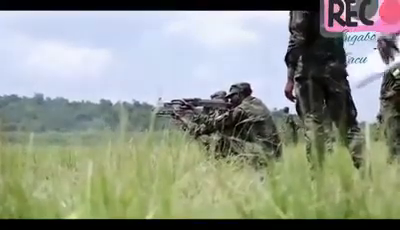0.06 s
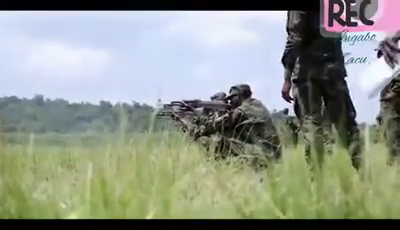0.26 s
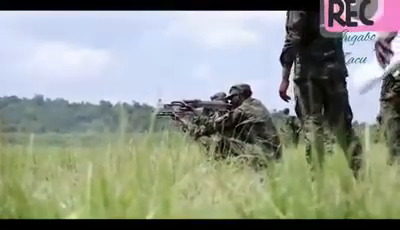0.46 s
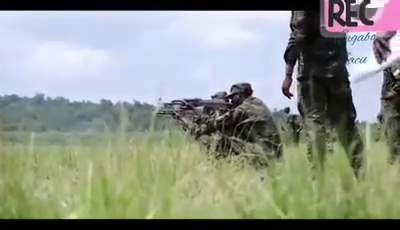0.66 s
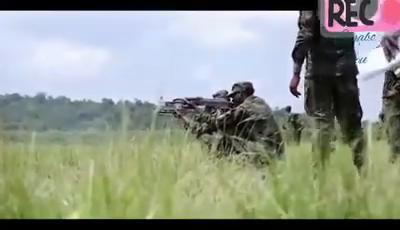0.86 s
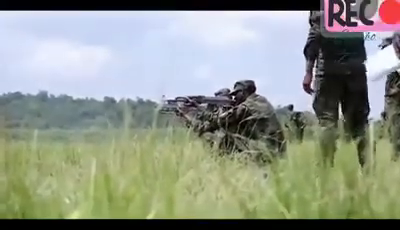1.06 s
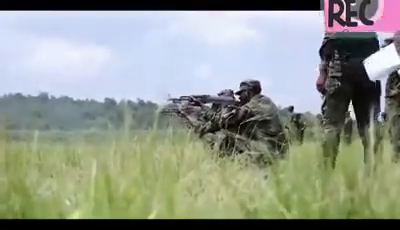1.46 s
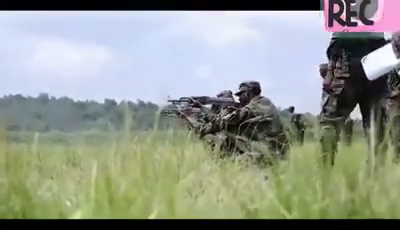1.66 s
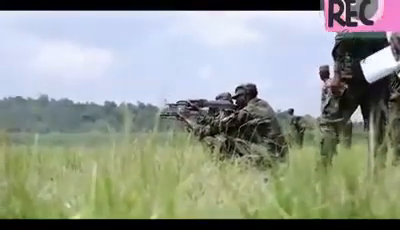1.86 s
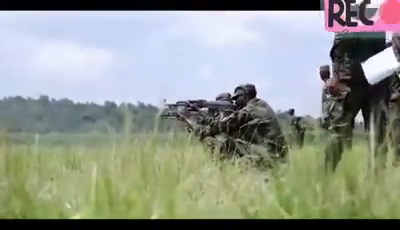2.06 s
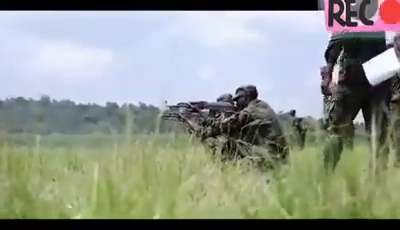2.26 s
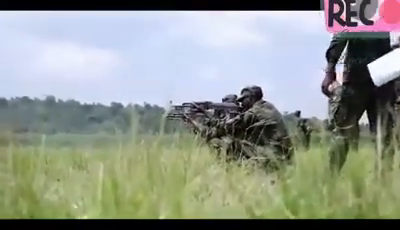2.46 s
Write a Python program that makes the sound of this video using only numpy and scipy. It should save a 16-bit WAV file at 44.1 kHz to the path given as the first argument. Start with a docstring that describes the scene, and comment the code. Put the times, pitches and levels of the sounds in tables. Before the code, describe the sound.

Rifles fire a ragged string of sharp cracks and thumps across an open field.

```python
"""An open grass field, where soldiers fire rifles in a ragged line beside a small microphone.
Shots along the line arrive as a snap and a round thump over the ground; the closest ones as a
bright tearing crack. Grass and a far tree line scatter each shot back. Rifle parts click over
a faint outdoor hiss and low wind. The shots overload the microphone, and its automatic
volume control turns their echoes down."""
import sys
import numpy as np
from scipy import signal
from scipy.fft import rfft, irfft
from scipy.io import wavfile
from scipy.ndimage import uniform_filter1d

SR = 44100
rng = np.random.default_rng(int(sys.argv[2]) if len(sys.argv) > 2 else 0)


def int16_out(signal):
    """Quantize to a 16-bit WAV file."""
    q = np.round(np.clip(np.atleast_2d(signal).T, -1, 1) * 32767)
    wavfile.write(sys.argv[1], SR, q.astype(np.int16))


N = 110250


def amp(db):
    """Turns decibels into a number to multiply a sound by."""
    return 10 ** (np.asarray(db) / 20)


def unit(x):
    """Scales a sound to an average strength (rms) of 1."""
    return x / np.sqrt(np.mean(x ** 2) + 1e-20)


def look_up(table, hz, column=1):
    """Reads a table at any frequency, sliding smoothly between its rows."""
    table = np.array(table, float)
    return np.interp(np.log(hz + 1), np.log(table[:, 0] + 1), table[:, column])


def add(mix, start_s, sound):
    """Mixes a sound in at the given time."""
    part = mix[max(round(start_s * SR), 0):][:len(sound)]
    part += sound[:len(part)]


def noise(tone, size):
    """Steady noise; the tone table says how strong its lows and highs are."""
    hz = np.fft.rfftfreq(size, 1 / SR)
    phases = np.exp(2j * np.pi * rng.random(len(hz)))
    return unit(irfft(phases * amp(look_up(tone, hz)), size))


def dying_noise(table, hold_s=0):
    """One second of noise in which each frequency holds, then dies at its own speed."""
    hz, t, bands = signal.stft(rng.standard_normal(SR), SR, nperseg=256)
    fade_s = np.maximum(look_up(table, hz, column=2), .01)[:, None]
    fade = amp(-60 * np.maximum(t - hold_s, 0) / fade_s)
    tail = signal.istft(bands * fade, SR, nperseg=256)[1][:SR]
    tone = amp(look_up(table, np.fft.rfftfreq(2 * SR, 1 / SR)))
    return irfft(rfft(tail, 2 * SR) * tone)[:SR]


# Tone of the hiss and low wind: f/Hz, level/dB
HISS_TONE = [(30, 0.5), (70, -1.5), (170, 10.5), (300, 0), (600, -6), (1300, -1.5), (2600, 0.5),
             (4000, -4.5), (6000, -10.5), (9000, -17.5), (11000, -56)]
# How their loudness wanders: t/s, level/dB
HISS_LOUDNESS = [(0, -48), (.7, -51.5), (.95, -54), (1.3, -46.5), (1.44, -61.5), (1.62, -51.5), (1.75, -53),
                 (2.07, -55.5), (2.16, -51), (2.38, -54.5), (2.44, -52), (2.5, -51.5)]
# Tone of an earlier shot rolling back from the trees: f/Hz, level/dB
ROLL_TONE = [(50, -37), (110, -3.5), (200, 5.5), (350, -4), (700, -5), (1300, 2), (1900, 7), (2700, -1.5),
             (4000, -13.5), (6000, -24.5), (9500, -41.5)]

def field_background(roll_db=-35, roll_fade_db_per_s=46, patch_db=1.5):
    """Outdoor hiss, low wind and the fading roll of an earlier shot, all in uneven patches."""
    t = np.arange(N) / SR
    hiss = noise(HISS_TONE, N) * amp(np.interp(t, *np.transpose(HISS_LOUDNESS)))
    roll = noise(ROLL_TONE, N) * amp(roll_db - roll_fade_db_per_s * t)
    bands = signal.stft(hiss + roll, nperseg=512)[2]
    patches = uniform_filter1d(rng.standard_normal(bands.shape), size=14, axis=0)  # across pitch
    patches = unit(uniform_filter1d(patches, size=4, axis=1))  # across time
    return signal.istft(bands * amp(patch_db * patches), nperseg=512)[1][:N]


def snap(t, length_s=0.00071):
    """The front of a blast, rounded by distance into one short hump."""
    return np.sin(np.pi * np.clip(t / length_s, 0, 1))


def thump(t, hz, peak_s=0.0013):
    """The low wave that soft ground lets through: it swells and dies in under two cycles."""
    age = np.maximum(t, 0) / peak_s
    return (age * np.exp(1 - age)) ** 0.96 * np.sin(2 * np.pi * hz * t)


# Basic tone of the spray: f/Hz, level/dB
SPRAY_TONE = [(100, 3), (500, 3.5), (1300, 1), (2200, -2.5), (4500, -6), (7000, -3.5), (9500, -9.5),
              (14000, -58.5)]

def spray(t, db, tilt_db, peak_hz, decay_s, shape, stop_s=0.013):
    """The jagged burst of small shocks behind the front. A larger shape ends it more suddenly."""
    fade = (t >= 0) * np.exp(-abs(t / decay_s) ** shape - (t / stop_s) ** 4)
    spectrum = rfft(fade * rng.standard_normal(len(t)))
    spectrum /= np.sqrt(uniform_filter1d(abs(spectrum) ** 2, size=25))  # even out chance peaks
    hz = np.fft.rfftfreq(len(t), 1 / SR)
    octaves = np.log2(np.maximum(hz, 300))
    peak_db = 5 * np.exp(-.5 * ((octaves - np.log2(peak_hz)) / .3) ** 2)
    burst = irfft(spectrum * amp(look_up(SPRAY_TONE, hz) + tilt_db * octaves + peak_db))
    return amp(db) * unit(burst) * np.sqrt(np.mean(fade ** 2))


def bite(t, db, hz, length_s=0.0026):
    """A brief band of treble at the very front of the crack."""
    fade = (t >= 0) * np.exp(-(t / length_s) ** 2)
    band = noise([(hz / 2, -24.5), (hz, 0), (hz * 2, -24.5)], len(t))
    return amp(db) * unit(fade * band) * np.sqrt(np.mean(fade ** 2))


def scatter(table):
    """Many tiny echoes blurred into a tail; a longer tail spreads the same energy more thinly."""
    return dying_noise([(hz, db - 10 * np.log10(SR * fade_s / np.log(1e6)), fade_s)
                        for hz, db, fade_s in table])


# Echo from the grass and men nearby: f/Hz, total level/dB, time to fade by 60 dB/s
NEAR_ECHO = [(60, -38.5, 0.18), (193, -19, 0.49), (330, -12.5, 0.27), (550, -11, 0.068), (1593, -14, 0.087),
             (4020, -20, 0.16), (9030, -20, 0.075)]
# Echo from far across the field: f/Hz, total level/dB, time to fade by 60 dB/s
FAR_ECHO = [(50, -39, 0.68), (136, -21.5, 0.68), (297.3, -17.5, 0.76), (515, -20, 0.41), (1310, -26, 0.4),
            (3000, -23, 0.33), (6000, -27.5, 0.87), (9700, -21, 0.24)]

def with_echoes(blast, burst, blast_echo_db, burst_echo_db, clump_db=2.5, swell_s=.02):
    """A shot followed by its lumpy near echo and the slower swell of the far one."""
    swell = 1 - np.exp(-np.arange(SR) / SR / swell_s)
    clumps = amp(clump_db * unit(uniform_filter1d(rng.standard_normal(SR), size=130)))
    tail = clumps * scatter(NEAR_ECHO) + swell * scatter(FAR_ECHO)
    shot = signal.fftconvolve(amp(blast_echo_db) * blast + amp(burst_echo_db) * burst, tail)
    add(shot, 0, blast + burst)
    return shot


# Shots along the line: t/s, snap level/dB, thump level/dB, thump f/Hz, spray level/dB,
# spray tilt/(dB per octave), spray peak f/Hz, bite f/Hz, spray decay/s, blast echo/dB, spray echo/dB
LINE_SHOTS = [(0.2094, 7.5, 5.5, 192, -12, 0, 660, 6900, 0.0037, -7, 8),
              (0.3324, -5.5, -2, 205, -13.5, 2.5, 1560, 2320, 0.0015, -1, 7.5),
              (1.0047, 3, 14.5, 187.5, 1.5, 0.1, 1940, 4900, 0.0016, -6.5, 5.5),
              (1.4943, 5.5, -4, 189, -7, 1.3, 736, 4220, 0.0016, -2, -0.5),
              (1.7747, -0.5, 0, 199, -16.5, 1.9, 1440, 2730, 0.0019, -2, 5.5),
              (1.8368, 5.5, 1.5, 180.6, -6.5, 3.5, 800, 4940, 0.0046, -2.5, -19),
              (1.8462, 3.5, -0.5, 186, -5, 0, 1450, 7400, 0.0037, -9, 0),
              (1.9895, -4.5, -4, 185, -23, 0, 887, 2600, 0.0048, -7, 8),
              (2.2257, 0, 1.5, 197.5, -15, -0.26, 1012, 3660, 0.0024, -7, 5.5)]

def line_shot(start_s, snap_db, thump_db, thump_hz, spray_db, tilt_db, peak_hz, bite_hz, decay_s,
              *echo_db):
    """A rifle down the line: a short snap, its bounce off the ground, then the thump."""
    t = np.arange(-256, 1792) / SR
    front = snap(t) + amp(-9.5) * snap(t - 0.00052)
    blast = amp(thump_db) * thump(t - 0.00097, thump_hz) - amp(snap_db) * front
    burst = spray(t, spray_db, tilt_db, peak_hz, decay_s, shape=0.55)
    shot = with_echoes(blast, burst, *echo_db)
    add(shot, 0, bite(t, spray_db - 9.5, bite_hz))
    return start_s + t[0], shot


def shock(t, push_s, rise_s=.00005):
    """A blast wave: the air pushes suddenly, then falls back and sucks the other way."""
    t = np.maximum(t, 0)
    return (1 - np.exp(-t / rise_s)) * (1 - t / push_s) * np.exp(-t / push_s)


# The closest shots: t/s, push level/dB, push length/s, thump level/dB, spray level/dB,
# spray tilt/(dB per octave), spray peak f/Hz, bite f/Hz, spray decay/s, blast echo/dB, spray echo/dB
CLOSE_SHOTS = [(0.2416, 5.5, 0.0012, -11, 1.5, -1.4, 2620, 4730, 0.0032, -2.5, 2),
               (1.1552, 2.5, 0.0011, -2, 2.5, -1, 1430, 4630, 0.0049, 1.5, 3.5),
               (1.2186, 5, 0.0016, -6.5, -10.5, -0.2, 2190, 4900, 0.0068, -1.5, -4),
               (1.2958, -0.5, 0.00035, -24.5, -4, -0.47, 1150, 3520, 0.0046, 2, 0)]

def close_shot(start_s, push_db, push_s, thump_db, spray_db, tilt_db, peak_hz, bite_hz, decay_s,
               *echo_db):
    """A rifle close by: a sharp blast, a strong spray, one quick reflection and a little thump."""
    t = np.arange(-256, 1792) / SR
    push = shock(t, push_s) + amp(-9) * shock(t - .0056, push_s)
    blast = amp(push_db) * push - amp(thump_db) * thump(t - 0.0018, hz=140)
    burst = spray(t, spray_db, tilt_db, peak_hz, decay_s, shape=1.43)
    shot = with_echoes(blast, burst, *echo_db)
    add(shot, 0, bite(t, spray_db - 5, bite_hz))
    return start_s + t[0], shot


# Tone of the blurred shot: f/Hz, level/dB, time to fade by 60 dB/s
BLURRED_TONE = [(40.6, -41, .15), (114, 5, 0.28), (230, 8.5, 0.26), (402, 0.5, 0.31), (655, -5, 0.18),
                (1500, -15.5, 0.35), (3000, -13, 0.22), (5990, -25, 0.28), (9500, -31, 0.57)]

def blurred_shot(db=-19, rise_s=0.00078):
    """A shot that arrives only as scattered echoes, with no sharp front."""
    tail = dying_noise(BLURRED_TONE, hold_s=0.0082)
    tone = amp(look_up(BLURRED_TONE, np.linspace(0, SR / 2, SR)))
    rise = np.minimum(np.arange(SR) / SR / rise_s, 1)
    return amp(db) * rise * tail / np.sqrt(np.mean(tone ** 2))


def knock(db=-24, hz=1010, decay_s=0.0026):
    """A faint knock: one note that rings very briefly."""
    t = np.arange(2048) / SR
    return amp(db) * np.sin(2 * np.pi * hz * t) * np.exp(-t / decay_s)


# Tone of a click: f/Hz, level/dB
CLICK_TONE = [(200, -36), (1000, -19), (2500, 4), (5000, -5.5), (8000, -3.5), (11000, -20)]
# Clicks and scrapes: t/s, level/dB, decay/s
RIFLE_CLICKS = [(0.509, -30, 0.0086), (0.612, -41.5, 0.021), (0.873, -34.5, 0.0022), (1.032, -32.5, 0.0043),
                (1.246, -27.5, 0.0033), (1.376, -38.5, 0.0071), (1.453, -46, 0.0045), (1.523, -40.5, 0.015),
                (1.573, -45, 0.014), (1.877, -40, 0.0052), (2.437, -48, 0.0064)]

def rifle_click(db, decay_s, rise_s=0.00036):
    """A rifle part or spent case makes a brief, bright scrape."""
    t = np.arange(4096) / SR
    return amp(db) * noise(CLICK_TONE, len(t)) * np.minimum(t / rise_s, 1) * np.exp(-t / decay_s)


def volume_control(x, threshold_db=-10.5, share=0.11, recovery_db_per_s=54, react_s=0.0054):
    """Turns down just after a loud shot, too late for the shot itself, and then recovers."""
    power_db = 10 * np.log10(signal.lfilter(np.ones(256) / 256, 1, x ** 2) + 1e-12)
    fall_db = np.arange(N) / SR * recovery_db_per_s
    held_db = np.maximum.accumulate(power_db + fall_db) - fall_db  # each peak sinks away slowly
    excess_db = np.maximum(held_db - threshold_db, 0)
    lag = np.exp(-1 / (react_s * SR))
    return x * amp(-share * signal.lfilter([1 - lag], [1, -lag], excess_db))


def lowpass(x, hz):
    """Cuts away the treble above a frequency."""
    return signal.oaconvolve(x, signal.firwin(201, hz, window=("kaiser", 8), fs=SR), "same")


def scene():
    """All the shots and small sounds over the background of the field."""
    mix = field_background()
    for row in LINE_SHOTS:
        add(mix, *line_shot(*row))
    for row in CLOSE_SHOTS:
        add(mix, *close_shot(*row))
    add(mix, start_s=.364, sound=blurred_shot())
    add(mix, start_s=.4235, sound=knock())
    for start_s, db, decay_s in RIFLE_CLICKS:
        add(mix, start_s, rifle_click(db, decay_s))
    return mix[None]


def record(dry):
    """The small microphone loses deep bass and overloads; the echoes are turned down, the treble is dulled, and
    the loudest peaks are flattened once more."""
    bass_cut_hz, ceiling, hardness = 62.6, 1.094, 6.6
    thinned = signal.lfilter(*signal.butter(2, bass_cut_hz, "high", fs=SR), dry[0])
    squashed = thinned / (1 + abs(thinned / ceiling) ** hardness) ** (1 / hardness)
    dulled = lowpass(volume_control(squashed), hz=9975)
    return lowpass(np.clip(dulled, -1, 1), hz=16000)[None]


dry = scene()
out = record(dry)
int16_out(out)
```